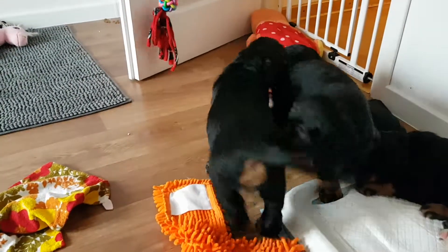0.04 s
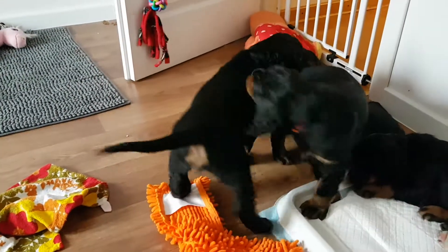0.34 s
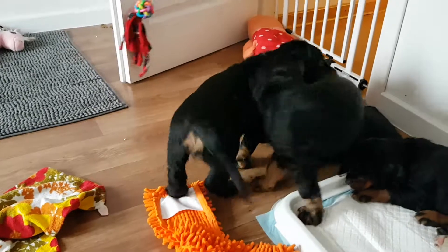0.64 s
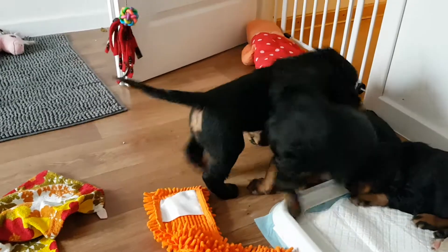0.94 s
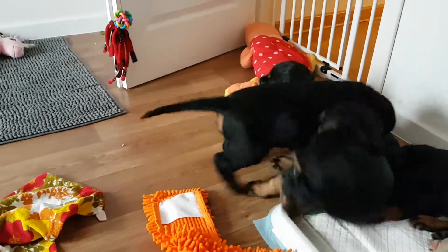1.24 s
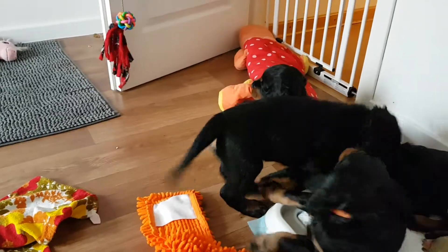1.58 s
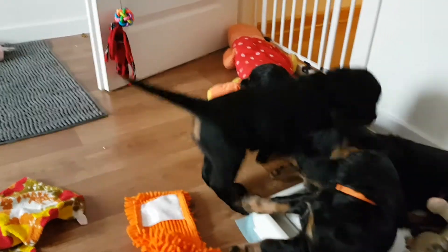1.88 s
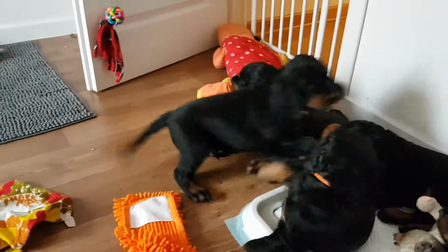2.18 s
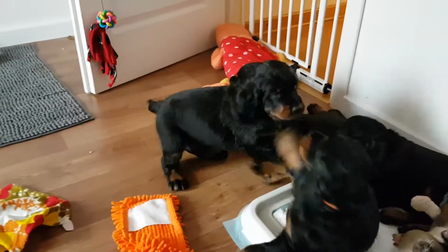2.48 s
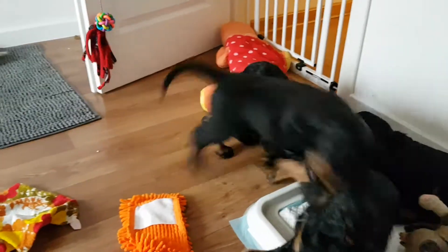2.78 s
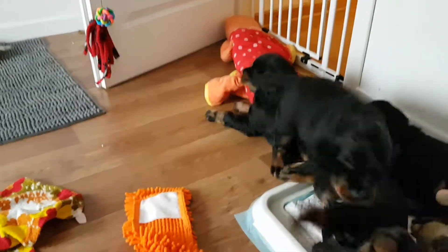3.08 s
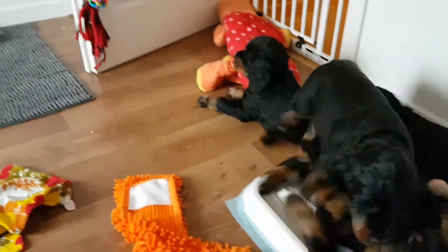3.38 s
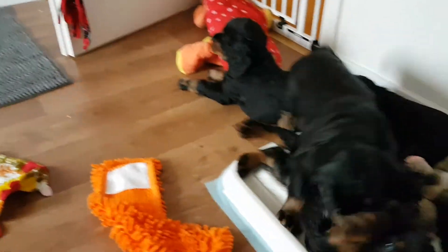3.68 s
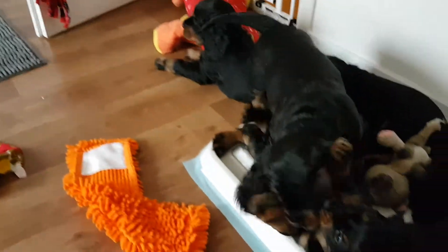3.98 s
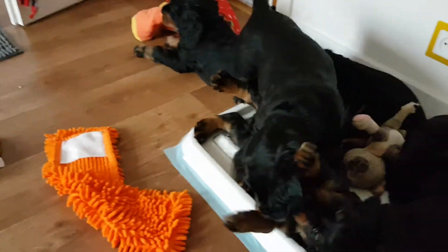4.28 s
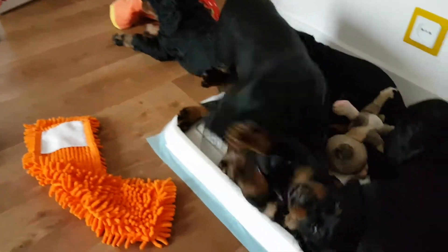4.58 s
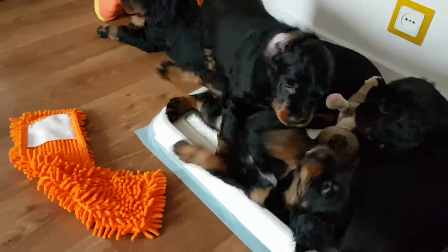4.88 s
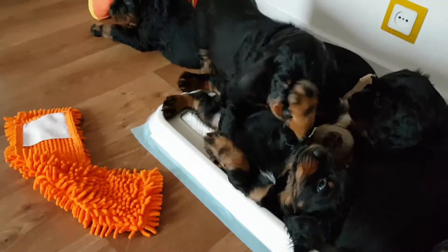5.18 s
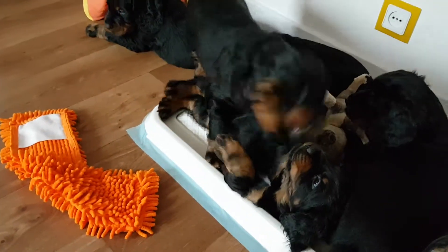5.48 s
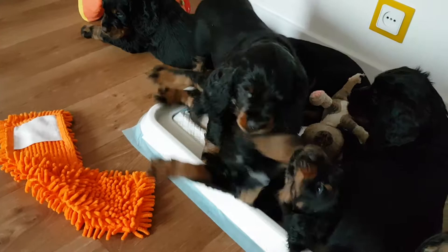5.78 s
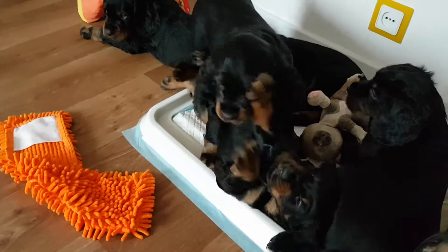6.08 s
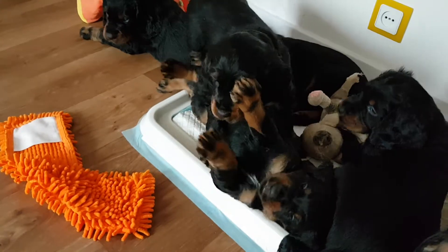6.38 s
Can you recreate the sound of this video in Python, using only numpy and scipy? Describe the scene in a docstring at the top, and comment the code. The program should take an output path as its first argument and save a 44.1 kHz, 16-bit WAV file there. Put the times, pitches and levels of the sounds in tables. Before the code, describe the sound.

Puppies wrestle on a wooden floor in a small, quiet room. Claws click on the boards and a plastic tray, paws thump and fur rubs, with a few soft grumbles and puffs of breath. From about halfway, one puppy gives five short, low, raspy growls, two of them rising in pitch, with a snort after the third. It is all close to the microphone, with short echoes.

```python
"""A puppy growls five times, just in front of a stereo pair of microphones in a small wooden-floored room.
Its vocal folds buzz through chest, throat and muzzle, turning rough and raspy as the jaws open; soft
grumbles, puffs and thin whistles of breath come before and among the growls, and a snort ends the third.
Around it the litter wrestles: claws click on the boards and a plastic tray, paws thump, fur rubs.
The walls answer with short echoes, and the quiet house lies behind it all."""
import sys
import numpy as np
from scipy import signal
from scipy.fft import rfft, irfft, next_fast_len
from scipy.io import wavfile
from scipy.ndimage import minimum_filter1d, map_coordinates

SR = 44100
rng = np.random.default_rng(int(sys.argv[2]) if len(sys.argv) > 2 else 0)


def wrap_up_sound(samples):
    """Save the sound to the file named by the first command line argument, as 16-bit audio."""
    columns = np.atleast_2d(samples).T
    # keep every value between -1 and 1, then stretch to whole-number steps
    tamed = np.clip(columns, -1, 1)
    steps = np.round(tamed * 32767).astype(np.int16)
    wavfile.write(sys.argv[1], SR, steps)


N = 284004
TIME = np.arange(N) / SR

# One list per growl: t/s, pitch f/Hz, effort level/dB, mouth opening (muzzle over chest) level/dB
GROWL_GESTURES = [
    [(2.925, 124.8, -39, -8.5), (2.945, 123.2, -33, -20), (2.99, 119.9, -34, -10.5),
     (3.045, 116.6, -37.5, -13.5), (3.075, 111.5, -38.5, -1), (3.156, 112.3, -40, 0),
     (3.21, 109.6, -57, -29)],
    [(3.34, 119.3, -50, 12.5), (3.38, 122, -31, -5.5), (3.448, 122.9, -34, -13), (3.52, 123.5, -29.5, -3.5),
     (3.636, 110.1, -36.5, -13), (3.69, 107.5, -63, 5)],
    [(4.02, 118.1, -45, -2), (4.045, 115.4, -33, -9.5), (4.2, 110.5, -37.5, -9.5),
     (4.33, 120, -32.5, -11.5), (4.42, 119.3, -33, -11), (4.5, 131.9, -29, -8.5), (4.565, 147.7, -23.5, -5),
     (4.615, 171.5, -28, 0.5), (4.67, 159.7, -46, -7)],
    [(5.125, 88, -50, -24), (5.16, 90.6, -42.5, -16.5), (5.26, 92.36, -38, -11.5), (5.36, 100.3, -39.5, -2),
     (5.44, 113.2, -41, -4.5), (5.495, 138.8, -28.5, -5), (5.55, 169.9, -26.5, -5.5),
     (5.595, 182.9, -25.5, -6), (5.65, 167.9, -48.5, -26)],
    [(5.875, 124, -42, -0.5), (5.9, 124.3, -34, 0.5), (5.925, 126.4, -28.5, -4.5), (6.01, 118.4, -39, -7),
     (6.06, 104, -36, -9), (6.11, 107.7, -36.5, -7), (6.2, 120.9, -33, -9), (6.31, 111.5, -36.5, -6.5),
     (6.44, 113, -35.5, -6.5)],
]
# The growl's low tone as the room colours it, head down and head up: f/Hz, level/dB
ROOM_COLOUR_DOWN = [(50, -40), (100, -8.5), (120, -1), (155, -4), (182, 3), (218, -1), (242, -17.5),
                    (290, -5.5), (360, -16.5)]
ROOM_COLOUR_UP = [(50, -40), (90, -9.5), (110, -5), (125, -0.5), (160, -3), (185, -1), (200, -9), (226, 4),
                  (255, -14), (380, -22)]
# Resonances of the throat, head down and head up: f/Hz, level/dB
THROAT_HEAD_DOWN = [(130, -50.5), (200, -13), (280, -3), (400, -1), (480, -6), (590, -5.5), (730, -16),
                    (1000, -16), (2000, -89.5)]
THROAT_HEAD_UP = [(150, -55), (220, 9), (290, -7.5), (380, 2.5), (440, -2.5), (510, -9.5), (590, -7),
                  (720, -24.5), (1000, -10), (2000, -73)]
# Throat in each growl: level/dB
THROAT_LEVELS = [-9.5, -8.5, -8.5, -8, -9.5]
# Slack folds flapping: f/Hz, level/dB
FOLD_FLUTTER = [(90, -38), (135, -2.5), (165, -2.5), (205, -3.5), (285, -8.5), (330, -20), (600, -68)]
def growls(fundamental_db=-1, octave_db=-2, flutter_db=-2, breakup_db=5):
    """Close up, vocal folds buzz; with effort they beat unevenly and let more air through."""
    gestures = [row for rows in GROWL_GESTURES for row in rows]
    times, *columns = np.transpose(gestures)
    pitch, effort_db, opening_db = (np.interp(TIME, times, column) for column in columns)
    down, up = sum(map(gate, GROWL_GESTURES[:3])), sum(map(gate, GROWL_GESTURES[3:]))
    effort, rough = amp(effort_db), roughness(effort_db)
    jitter = rough * (.08 * wobble(130) + .05 * wobble(35)) + .02 * wobble(26)
    phase = np.cumsum(pitch * (1 + jitter)) / SR
    # each closure comes a little early or late, blurring the upper harmonics
    closure = phase + (.025 + .06 * rough) * wobble(100)
    snaps = fold_snaps(closure, scatter_db=2 + 2.6 * rough)
    escaping_air = unit(np.exp(-7 * (closure % 1)))

    def breathy(air):
        """Snaps, each followed by a burst of air; more air when the voice is rough."""
        share = np.clip(air + .3 * rough, 0, 1)
        return np.sqrt(1 - share) * snaps + np.sqrt(share) * escaping_air * rng.standard_normal(N)

    def partial(harmonic, drift=0):
        """One line of the low tone, flickering in level."""
        shimmer = amp((2 + 1.5 * rough) * wobble(70) + 1.2 * wobble(14))
        return shimmer * np.cos(2 * np.pi * harmonic * phase + drift)

    tone = amp(fundamental_db) * partial(1) + amp(octave_db) * partial(2)
    # under strain the clean tone weakens, and strong and weak beats alternate
    tone *= amp(-breakup_db * rough ** 2)
    tone += rough ** 2 * partial(1.5, drift=wobble(30) / 2)
    hum = shaped(down * effort * tone, ROOM_COLOUR_DOWN) + shaped(up * effort * tone, ROOM_COLOUR_UP)
    flutter = amp(flutter_db) * rough * (down + up) * effort * through(breathy(.94), FOLD_FLUTTER)
    buzz = breathy(rough / 2)
    throat = down * through(buzz, THROAT_HEAD_DOWN) + up * through(buzz, THROAT_HEAD_UP)
    low_voice = effort * per_growl(amp(THROAT_LEVELS)) * throat + flutter
    bright_voice = mouth(effort_db + opening_db, breathy, down, up)
    low_in_room = room(low_voice, early_db=-1.5, tail_db=-4.5) + boom(low_voice)
    return np.sqrt(2) * hum + low_in_room + bright_voice


# Resonances of the muzzle, head down in the fur and head up: f/Hz, level/dB
MUZZLE_HEAD_DOWN = [(450, -25.5), (800, -17.5), (1000, -6.5), (1200, 3.5), (1400, -4), (1600, -3),
                    (1850, -19), (2700, -30), (3900, -23), (5200, -59), (15000, -42)]
MUZZLE_HEAD_UP = [(500, -53), (750, -19.5), (920, -9.5), (1130, 1.5), (1450, 0), (1600, -13.5), (1800, -39),
                  (2100, -27), (2600, -15.5), (3400, -18), (4200, -34), (5500, -44.5), (15000, -38)]
# Broad raspy hiss of the growl, head down (two narrow dips in the treble) and head up: f/Hz, level/dB
HISS_HEAD_DOWN = [(500, -25), (900, -12), (1650, 13), (2000, 2), (2700, 1.5), (3200, -1.5), (3950, 2.5),
                  (4400, -7), (5000, -10.5), (5700, -25), (6600, -17), (7300, -27), (8200, -20),
                  (11000, -20.5), (15500, -25)]
HISS_HEAD_UP = [(500, -25.5), (900, 6), (1700, 3.5), (2100, -1.5), (2550, 3), (3100, -18), (3700, -5),
                (4400, -6.5), (5900, -13), (7500, -24.5), (11000, -24.5), (15500, -41)]
# Rasp in each growl at easy flow: level/dB
RASP_LEVELS = [-11, -11.5, -5, -13, -14.5]
def mouth(flow_db, breathy, down, up, easy_flow_db=-38.5, lip_shift=1.039, relax_s=.19):
    """The buzz leaves through the muzzle, with a broad raspy hiss that grows faster than the flow."""
    # the lips start drawn back, raising the resonances, then relax
    drawn = per_growl([np.exp(-np.maximum(TIME - rows[0][0], 0) / relax_s) for rows in GROWL_GESTURES])

    def posture(muzzle, hiss, air, muzzle_db, rasp_growth):
        """Muzzle and rasp for one position of the head."""
        buzz = breathy(air / 2)
        lips_back = through(buzz, [(hz * lip_shift, db) for hz, db in muzzle])
        lips = drawn * lips_back + (1 - drawn) * through(buzz, muzzle)
        rasp_gain = per_growl(amp(RASP_LEVELS)) * amp(rasp_growth * (flow_db - easy_flow_db))
        return amp(flow_db) * (amp(muzzle_db) * lips + rasp_gain * through(breathy(air), hiss))

    head_down = down * posture(MUZZLE_HEAD_DOWN, HISS_HEAD_DOWN, air=.42, muzzle_db=-1, rasp_growth=.052)
    head_up = up * posture(MUZZLE_HEAD_UP, HISS_HEAD_UP, air=.3, muzzle_db=0, rasp_growth=1.38)
    return room(head_down, early_db=4, tail_db=3.5) + room(head_up, early_db=4.5, tail_db=2.5)


# Each growl before strain sets in: roughness/0-1
RELAXED_ROUGHNESS = [.3, .35, .11, .1, .09]
def roughness(effort_db, strain_db=-33, rough_per_db=.055, settle_s=.12):
    """Strain breaks the voice up at once; it settles only after a delay."""
    size = round(settle_s * SR)
    held_db = -minimum_filter1d(-effort_db, size, origin=(size - 1) // 2)
    return per_growl(RELAXED_ROUGHNESS) + rough_per_db * np.maximum(held_db - strain_db, 0)


def fold_snaps(phase, scatter_db):
    """One snap of the vocal folds per cycle, each of its own size."""
    at = np.flatnonzero(np.diff(np.floor(phase)) > 0)
    snap_db = scatter_db[at] * rng.standard_normal(len(at)) - scatter_db[at] ** 2 / 9
    train = np.zeros(N)
    train[at] = amp(snap_db) * np.sqrt(np.gradient(at))
    return train


# Soft grumbles, and puffs through nose and jaws: t/s, length/s, relative level/dB
LOW_GRUMBLES = [(.628, 0.087, -51.5), (.76, .1, -60), (2.08, 0.16, -47), (2.25, 0.13, -46.5),
                (4.72, .11, -53)]
AIR_PUFFS = [(2.05, 0.21, -57), (2.25, 0.077, -66), (3.335, 0.034, -44), (4.014, 0.034, -45.5),
             (4.69, 0.16, -41), (5.7, 0.096, -47)]
# Their spectra: f/Hz, level/dB
GRUMBLE_SPECTRUM = [(41, -33), (70, -9), (104, 0), (140, -9.5), (215, -12), (355, -27), (400, -20),
                    (575, -25.5), (633, -27), (900, -45), (1170, -84), (1980, -120)]
SNOUT_SPECTRUM = [(300, -39), (750, 0), (1100, 2), (1550, 2.5), (2100, -12.5), (2800, -4), (3900, -13.5),
                  (5200, -20.5), (7000, -23.5), (15000, -30)]
def grumbles(pitch_hz=56, grumble_db=5, puff_db=.5):
    """Slow slack beats of the folds, and puffs of air through the snout."""
    phase = np.cumsum(pitch_hz * np.exp(.25 * wobble(60))) / SR
    beats = through(fold_snaps(phase, scatter_db=np.full(N, 2.5)), GRUMBLE_SPECTRUM)
    grumble = amp(grumble_db) * bursts(LOW_GRUMBLES, attack_s=.0093, fade_db=13, release_s=.011) * beats
    breath = bursts(AIR_PUFFS, attack_s=.013, fade_db=9.5, release_s=.027)
    puff = amp(puff_db + .31 * wobble(73)) * breath * through(rng.standard_normal(N), SNOUT_SPECTRUM)
    return room(grumble + puff, early_db=-6.5, tail_db=-2)


# Thin whistles through nose and teeth: t/s, length/s, f/Hz, level/dB
BREATH_WHISTLES = [(2.048, .12, 1350, -62), (2.246, 0.071, 1065, -57.5), (2.854, 0.048, 6640, -56),
                   (2.977, 0.035, 3940, -61), (3.115, 0.075, 2970, -51), (3.338, 0.029, 1569, -41.5),
                   (3.47, 0.06, 4100, -60), (3.506, .05, 4900, -50), (4.017, 0.015, 1607, -38.5),
                   (4.566, 0.047, 3840, -39), (4.737, .06, 7200, -54.5), (4.787, .012, 2040, -36.5),
                   (5.604, 0.019, 2550, -38), (5.61, 0.011, 1589, -33)]
def whistles(damping=.057):
    """Air squeezed through a narrow gap rings one fuzzy resonance."""
    out = np.zeros(N + SR)
    for start, length, hz, db in BREATH_WHISTLES:
        size = round(length * SR)
        ring = signal.lfilter(*signal.iirpeak(hz, 1 / (2 * damping), SR), rng.standard_normal(SR // 4))
        ring = signal.lfilter(*signal.iirpeak(hz, 1 / (4 * damping), SR), ring)
        out[round(start * SR):][:size] += amp(db) * unit(ring[-size:]) * signal.windows.tukey(size, .5)
    return room(out[:N], early_db=-8.5, tail_db=-4)


# Claws and hard knocks; the last row is the click of the snort ending the third growl:
# t/s, relative level/dB, knock offset/dB, tick offset/dB
CLICKS = [(.31, -48, 2, -3), (.444, -58.5, 3, 4), (.479, -52, -17, -4), (0.964, -31.5, -28, -11.5),
          (1.021, -41.5, 0, -8.5), (1.091, -43, 2, -10), (1.149, -27, -9.5, -19), (1.152, -31.5, -2, -10),
          (1.351, -34.5, -9, -27), (1.361, -39, -2, -11), (1.388, -30.5, -2.5, -16), (1.406, -32, 1.5, 0.5),
          (1.416, -51, 19.5, -12), (2.804, -34.5, -17, -30), (3.069, -31.5, -6, -27),
          (3.082, -38.5, 7.5, -30), (3.255, -39, -2, -6), (3.524, -38, -5, -1), (3.837, -34.5, -6.5, -12.5),
          (3.886, -38, -14, -25), (4.793, -30, -18, -13.5)]
# Clack of a floorboard: f/Hz, level/dB
BOARD_SPECTRUM = [(400, -13.5), (750, 3), (1150, 6), (1550, 0.5), (2000, -3), (2650, -2), (3200, -5),
                  (4300, -11), (5500, -25), (8000, -47)]
def clicks(clack_db=22, knock_db=20, tick_db=20):
    """Claws on boards and tray, and the snort's click: a clack, a hollow knock and a bright tick."""
    times, db, low_db, high_db = np.transpose(CLICKS)
    hollow = [(180, -24), (350, -11.5), (530, 3), (850, 2.5), (1300, -34), (3000, -70)]
    bright = [(2500, -43), (5000, -1), (6800, 2), (9000, .5), (12500, 0), (16000, 1.5)]
    clack = through(contacts(times, db + clack_db, t60=.021, grit=1.1), BOARD_SPECTRUM)
    knock = through(contacts(times, db + low_db + knock_db, t60=.072, grit=.21), hollow)
    scratches = contacts(times, db + high_db + tick_db, t60=.054, grit=1.3)
    tick = through(scratches + amp(tick_db) * stray_taps(), bright)
    return room(clack + knock + tick, early_db=-2, tail_db=3)


def stray_taps(taps_per_s=5, tap_db=-57.5, spread_db=4):
    """Claws touch lightly at random moments while the puppies tumble."""
    touches = rng.random(N) < taps_per_s / SR
    return touches * amp(tap_db + spread_db * rng.standard_normal(N)) * tumbling()


# Paws and bodies landing; the last row is the snort's low thump: t/s, relative level/dB, thud offset/dB
THUMPS = [(.316, -45, 3), (.968, -36.5, -3.5), (1.02, -33.5, -7), (1.062, -48, 4), (1.154, -45, -9),
          (1.275, -47.5, -6), (1.408, -26.5, -15), (1.414, -36, -3.5), (1.508, -45.5, 0), (1.622, -52.5, 9),
          (3.073, -30.5, -1), (3.257, -46.5, 8.5), (3.761, -38.5, -8), (4.79, -32, -6.5)]
# Modes of the wooden floor: f/Hz, width/Hz, level/dB
FLOOR_MODES = [(158, 36, 1), (241, 16.7, 1.5), (289.6, 14, 2.5), (405, 43, -4), (528, 86, -2.5),
               (613, 73, -2.5), (750, 140, -9.5)]
def thumps(thump_db=23, thud_db=24, pad_hz=2200):
    """Soft pads ring the floor's modes over a deep thud; the snort's thump has the same sound."""
    def floor(hz):
        return sum((-1) ** k * resonance(hz, *mode) for k, mode in enumerate(FLOOR_MODES))

    times, db, deep_db = np.transpose(THUMPS)
    floor_rms = np.sqrt(np.mean(np.abs(floor(np.linspace(0, SR / 2, SR))) ** 2))
    pushes = contacts(times, db + thump_db, t60=.068, grit=.62)
    ring = filtered(pushes, lambda hz: floor(hz) / (1 + 1j * hz / pad_hz)) / floor_rms
    deep = [(45, -28), (100, -1), (160, 1), (220, -26), (500, -49)]
    thuds = through(contacts(times, db + deep_db + thud_db, t60=.027, grit=.35), deep)
    return room(ring + thuds + boom(ring), early_db=-3.5, tail_db=-5)


def contacts(times, levels_db, t60, grit):
    """Sharp pushes, each followed by a brief gritty tail."""
    out, t = np.zeros(N + SR), TIME[:SR // 10]
    for start, db in zip(times, levels_db):
        blow = rng.standard_normal(len(t)) * amp(-60 * t / t60)
        blow *= grit / np.linalg.norm(blow)
        blow[0] += 1
        out[round(start * SR):][:len(t)] += amp(db) * blow / np.linalg.norm(blow)
    return out[:N]


# A paw drags on the plastic tray's rim: t/s, length/s, level/dB
RIM_DRAGS = [(1.42, 0.069, -45.5), (1.495, .07, -42.5)]
# The tray's hollow hum: f/Hz, level/dB
TRAY_SPECTRUM = [(150, -45), (225, -10), (255, 0), (290, -10), (400, -42), (1000, -68)]
def tray():
    """Friction on the rim excites the tray's lowest mode."""
    friction = bursts(RIM_DRAGS, attack_s=.01, fade_db=4, release_s=.011)
    return room(friction * through(rng.standard_normal(N), TRAY_SPECTRUM), early_db=-8, tail_db=-6)


# Rubbing swells on the boards, and the second growl's raspy hiss near 3.5 s: t/s, length/s, level/dB
SWELLS = [(0.083, .14, -60.5), (0.446, .08, -61.5), (0.698, 0.23, -64), (0.91, 0.86, -63),
          (1.397, 0.051, -41), (1.597, 0.073, -61), (1.915, 0.091, -62), (2.029, 0.21, -56.5),
          (2.256, 0.16, -73), (2.758, 0.5, -57), (3.04, 0.84, -53), (3.127, 0.06, -47), (3.444, 0.15, -47),
          (3.819, 0.12, -53)]
# Rubbing fur: f/Hz, level/dB
FUR_SPECTRUM = [(180, -59), (300, 9), (385, 2.5), (678, 2.5), (842, 2.5), (1190, 3.5), (2000, -1),
                (3760, -7), (8220, -13), (16000, -16.5)]
def scuffle(fur_db=-64.5, grain_db=3):
    """Fur and pads rub over the floor in small catches and swells; one swell is a growl's hiss."""
    level = amp(fur_db) * tumbling()
    for start, length, db in SWELLS:
        size = round(length * SR)
        level[round(start * SR):][:size] += amp(db) * np.hanning(size)
    catches = amp(grain_db * wobble(160) + wobble(23.2))
    rub = level * unit(catches * through(rng.standard_normal(N), FUR_SPECTRUM))
    return room(rub, early_db=4.5, tail_db=6)


def tumbling(end_s=4.035, fade_s=.093):
    """1 while the puppies tumble about, 0 once they have settled."""
    return np.clip((end_s - TIME) / fade_s, 0, 1)


# Decay between the walls: f/Hz, t60/s
WALL_DECAY = [(150, 0.52), (1000, 0.3), (4000, 0.3), (12000, 0.29)]
def room(x, early_db, tail_db, early_t60=.079, spots=3):
    """The microphones hear direct sound, quick echoes from floor and corner, and a tail."""
    hz, t, noise = signal.stft(rng.standard_normal((spots, 2, SR // 2)), SR, nperseg=256)
    tails = signal.istft(noise * amp(-60 * t / along(WALL_DECAY, hz)[:, None]), SR, nperseg=256)[1]
    t = TIME[:tails.shape[-1]]
    tails *= np.clip(t / .0095, 0, 1)
    earlies = rng.standard_normal(tails.shape) * amp(-60 * t / early_t60) * (t > .001)
    # the puppies move: the echoes fade from spot to spot, one round a second
    weights = np.maximum(np.cos(2 * np.pi * (TIME - np.arange(spots)[:, None] / spots)), 0)
    weights /= np.linalg.norm(weights, axis=0)
    out = x
    for weight, early, tail in zip(weights, earlies, tails):
        echoes = amp(early_db) * early / np.linalg.norm(early[0])
        echoes += amp(tail_db) * tail / np.linalg.norm(tail[0])
        out = out + signal.fftconvolve((x * weight)[None], diffuse(echoes), axes=1)[:, :N]
    return out / np.sqrt(1 + amp(early_db) ** 2 + amp(tail_db) ** 2)


# The room's standing waves: f/Hz, width/Hz, level/dB
ROOM_MODES = [(134, 11, -14), (190, 12.71, 3), (226.6, 5.9, -6.5), (276.4, 5.2, 0)]
def boom(x):
    """Standing waves pick up the low notes and ring on."""
    return filtered(x, lambda hz: sum(resonance(hz, *mode) for mode in ROOM_MODES))


# Diffuse sound at the two microphones: f/Hz, left-right correlation
MIC_CORRELATION = [(120, 0.9), (300, 0.91), (600, 0.61), (1200, -0.07), (2500, -0.1), (5000, -0.13)]
def diffuse(pair):
    """Two unrelated signals become left and right: alike in the bass, apart in the treble."""
    size = pair.shape[1]
    turn = np.arccos(np.clip(along(MIC_CORRELATION, np.fft.rfftfreq(size, 1 / SR)), -1, 1)) / 2
    mid, side = irfft(rfft(pair) * [np.cos(turn), np.sin(turn)], size)
    return np.array([mid + side, mid - side])


# Room tone: f/Hz, level/dB
HOUSE_SPECTRUM = [(15, -36), (25, -32), (44, -11.5), (270, -8.5), (335, -24), (516, -16), (1150, -26.5),
                  (2280, -24.5), (4610, -33.5), (8140, -35.5), (9570, -37), (14800, -34.5), (16000, -101)]
def room_tone(rush_db=-65, drone_db=-69):
    """The quiet house all around the microphones: a faint rush and a low drone."""
    def noise(spectrum):
        return unit(diffuse(filtered(rng.standard_normal((2, N)), lambda hz: amp(along(spectrum, hz)))))

    drone = [(35, -58), (45, -5), (51, 17.5), (62, 2), (80, -13), (130, -44)]
    return amp(rush_db) * noise(HOUSE_SPECTRUM) + amp(drone_db) * noise(drone)


def amp(db):
    """Decibels to gain."""
    return 10 ** (np.asarray(db) / 20)


def unit(x):
    """Scale to rms 1."""
    return x / np.sqrt(np.mean(x ** 2) + 1e-20)


def along(points, hz):
    """(f/Hz, value) points read on a log axis."""
    freqs, values = np.transpose(points)
    return np.interp(np.log(hz + 1), np.log(freqs), values)


def gate(rows, edge_s=.011):
    """1 while a gesture lasts, with soft edges."""
    return np.clip(np.minimum(TIME - rows[0][0], rows[-1][0] - TIME) / edge_s + 1, 0, 1)


def per_growl(values):
    """Each growl's own value while it lasts, 0 between growls."""
    return sum(value * gate(rows) for value, rows in zip(values, GROWL_GESTURES))


def bursts(rows, attack_s, fade_db, release_s):
    """Gain of short events: each rises quickly, fades and stops."""
    out = np.zeros(N)
    for start, length, db in rows:
        age = np.clip(TIME - start, 0, length)
        edges = np.minimum(age / attack_s, 1) * np.minimum((length - age) / release_s, 1)
        out += amp(db - fade_db * age / length) * edges
    return out


def wobble(rate):
    """A smooth random curve, rate knots a second."""
    return map_coordinates(rng.standard_normal(int(N * rate / SR) + 4), [TIME * rate])


def resonance(hz, centre_hz, width_hz, db):
    """Complex response of one damped mode."""
    loss = 1j * hz * width_hz
    return amp(db) * loss / (centre_hz ** 2 - hz ** 2 + loss)


def filtered(x, response):
    """x times a response of frequency."""
    size = next_fast_len(N + SR // 2)
    return irfft(rfft(x, size) * response(np.fft.rfftfreq(size, 1 / SR)), size)[..., :N]


def through(x, spectrum, size=4096):
    """x rings a filter of the given (f/Hz, level/dB) shape: minimum phase, energy 1."""
    cepstrum = irfft(np.log(amp(along(spectrum, np.fft.rfftfreq(size, 1 / SR))) + 1e-6))
    cepstrum[1:size // 2] *= 2
    cepstrum[size // 2 + 1:] = 0
    impulse = irfft(np.exp(rfft(cepstrum)))
    return signal.fftconvolve(x, impulse / np.linalg.norm(impulse))[:N]


def shaped(x, spectrum):
    """x rings a filter whose levels act as absolute gains."""
    gains = amp(along(spectrum, np.linspace(0, SR / 2, SR)))
    return through(x, spectrum) * np.sqrt(np.mean(gains ** 2))


def scene():
    """The litter plays just in front of the microphones, the clicks a touch to the left."""
    voice = growls() + grumbles() + whistles()
    return voice + clicks() * amp([[.3], [-.3]]) + thumps() + tray() + scuffle() + room_tone()


def record(dry, top_hz=15850):
    """The microphone chain passes nothing above top_hz."""
    return filtered(dry, lambda hz: hz < top_hz)


dry = scene()
out = record(dry)
wrap_up_sound(out)
```